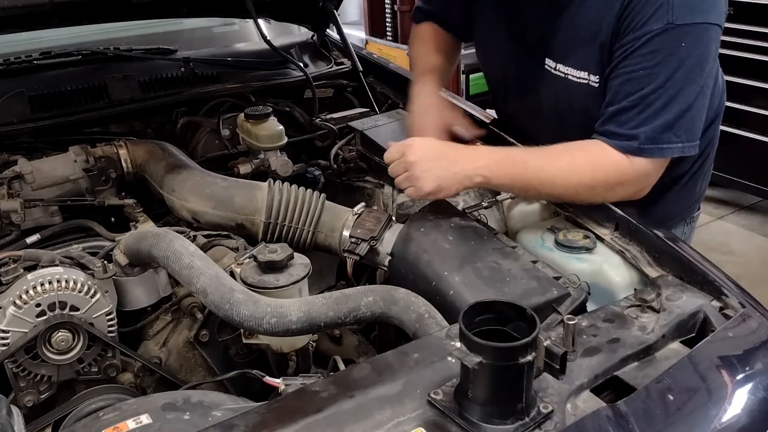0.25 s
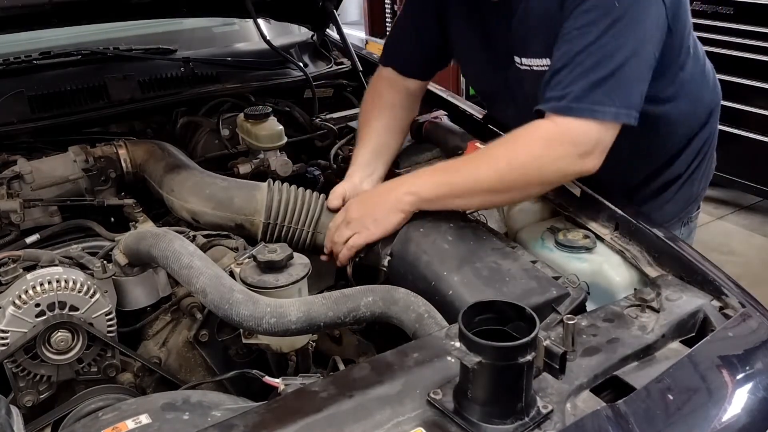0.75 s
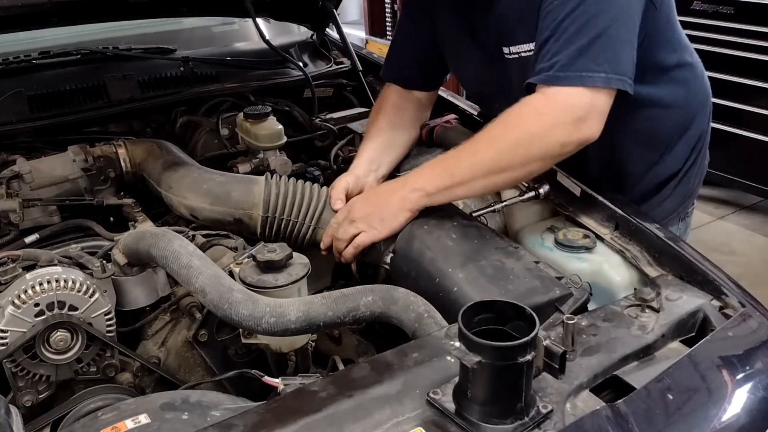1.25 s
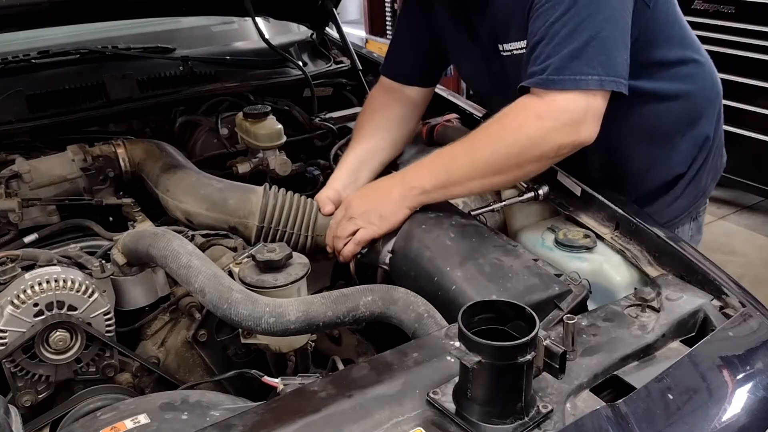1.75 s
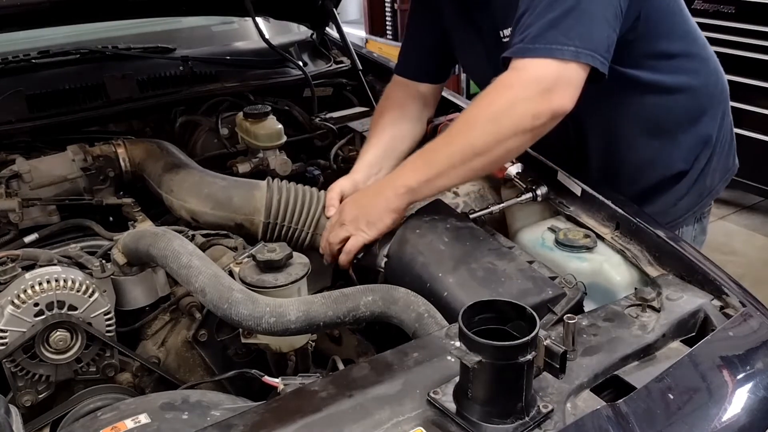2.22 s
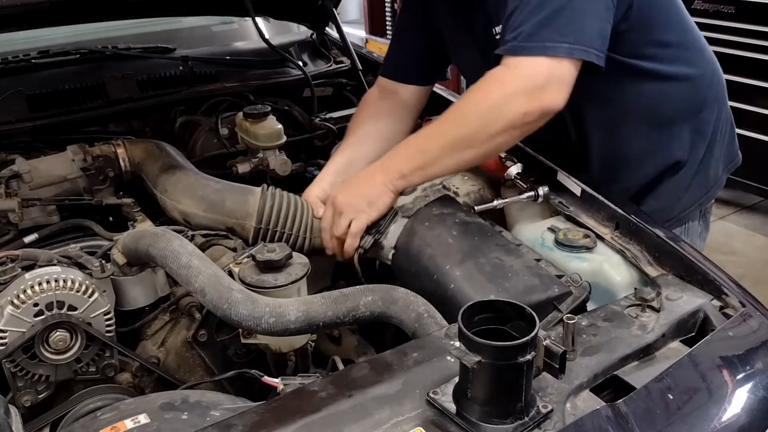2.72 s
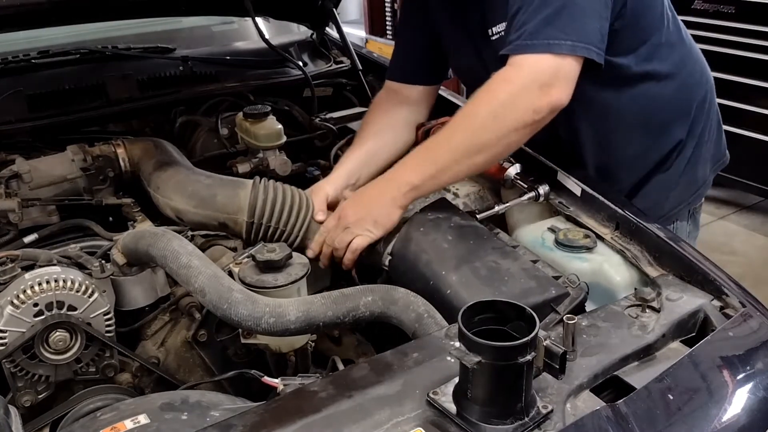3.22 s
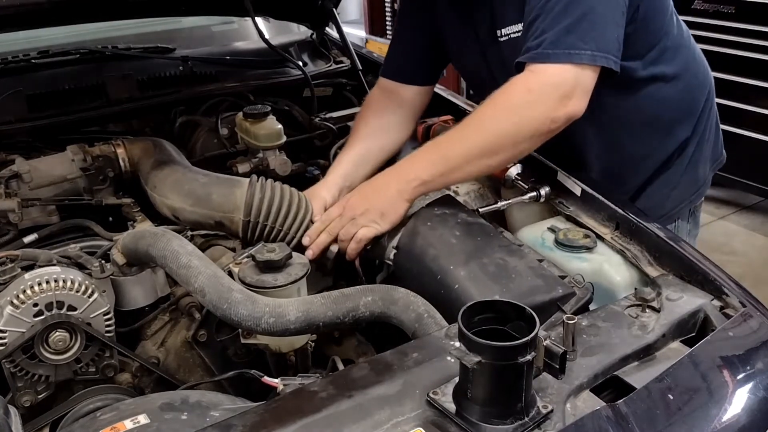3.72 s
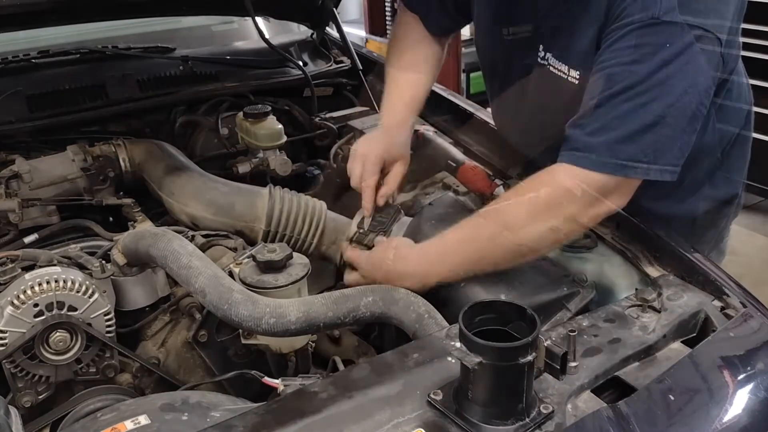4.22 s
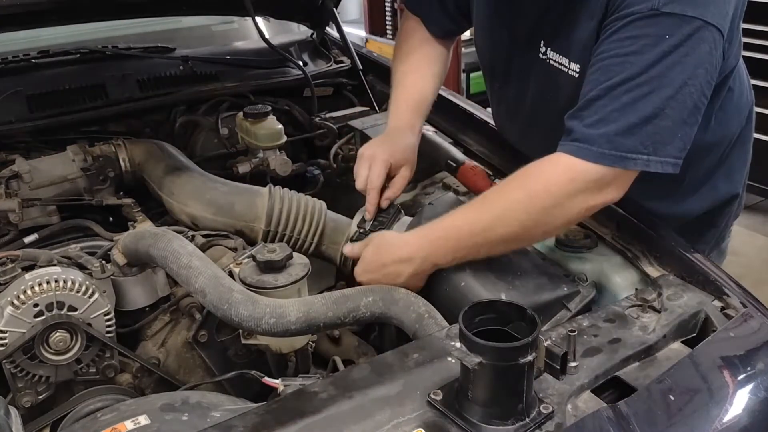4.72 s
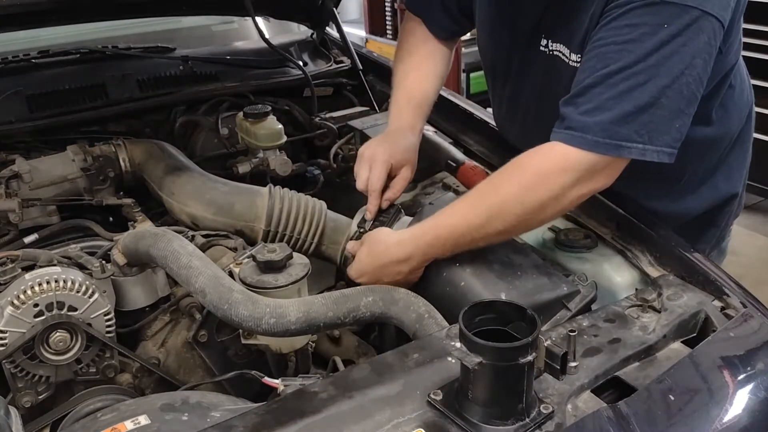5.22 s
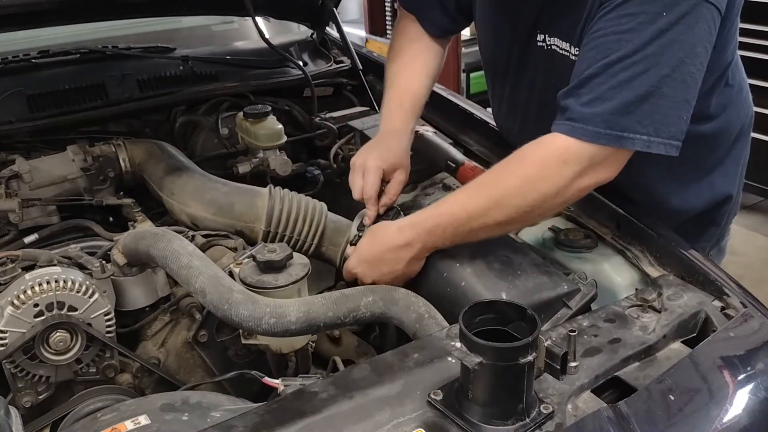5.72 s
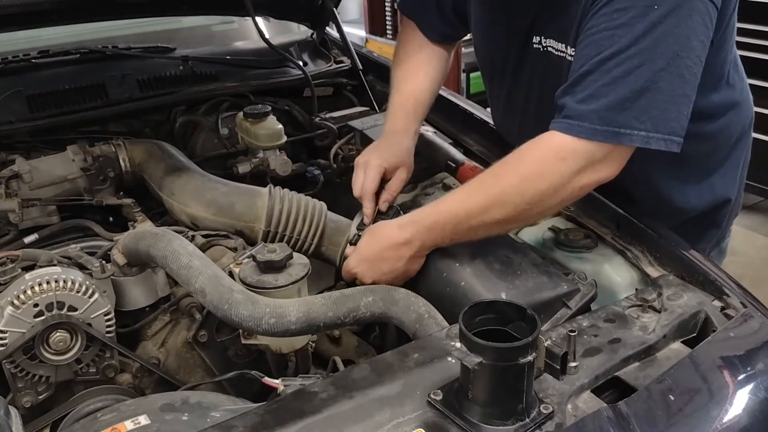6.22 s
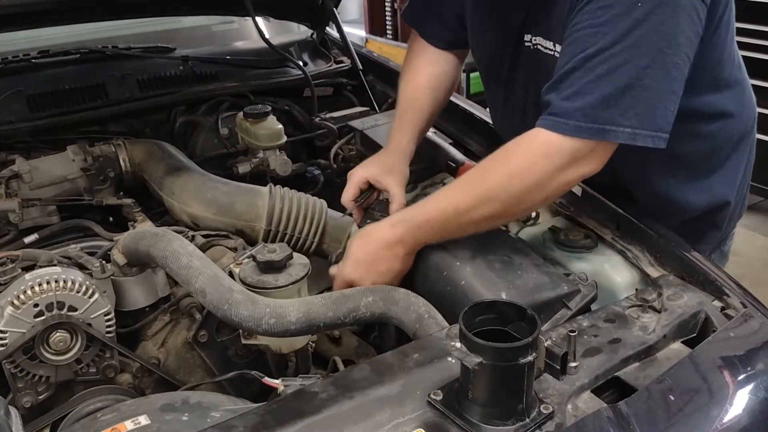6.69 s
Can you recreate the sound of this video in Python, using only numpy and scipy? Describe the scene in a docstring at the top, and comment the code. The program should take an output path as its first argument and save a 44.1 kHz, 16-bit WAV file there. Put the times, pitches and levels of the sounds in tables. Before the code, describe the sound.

Someone works a rubber duct loose from a plastic air box under a car hood. Booming thuds and scrapes come first, then faint rubbing, a second cluster of hard knocks, rubber dragging and small clamp taps. The later part is mostly soft hum and air noise until a final ringing tool knock. Nearby microphone, live hard-walled garage.

```python
"""Hands and a tool work a rubber intake duct loose from a plastic air box under an open car hood. Over hum, air
noise and hiss, hard blows boom and a noisy swell lingers; lighter knocks, rubs and clicks follow. After 2.6 s
come a burst of blows, two more swells, taps on a ringing steel clamp and faint rings of the tool. A last loud
knock, tool ring and swell close it. Blows, clamp and tool are decaying modes, clicks, rubs and swells are
shaped noise, and all the handling echoes from the hard walls of a garage."""
import sys
import numpy as np
from scipy import signal
from scipy.fft import rfft, irfft, next_fast_len
from scipy.io import wavfile
from scipy.ndimage import map_coordinates

SR = 44100
rng = np.random.default_rng(int(sys.argv[2]) if len(sys.argv) > 2 else 0)


def transcribe(signal):
    """Save signal, clipped to [-1, 1], as a 16-bit WAV file at the path in sys.argv[1]."""
    frames = np.atleast_2d(signal).T
    limited = np.clip(frames, -1, 1)
    pcm = np.round(limited * 32767).astype(np.int16)
    wavfile.write(sys.argv[1], SR, pcm)


N = 306495  # samples
LEAD = SR // 4  # samples ahead of time zero, for sounds that begin earlier


def amp(db):
    """Decibel law: level in dB to amplitude ratio."""
    return 10 ** (np.asarray(db) / 20)


def unit(x):
    """Normalisation to rms 1."""
    return x / np.sqrt(np.mean(x ** 2) + 1e-20)


def onset_unit(x):
    """Normalisation to rms 1 over the first fiftieth of a second."""
    return x / np.sqrt(np.mean(x[..., :SR // 50] ** 2) + 1e-20)


def along(points, hz):
    """Interpolation of (Hz, value) points on a logarithmic frequency axis."""
    f, v = np.transpose(points)
    return np.interp(np.log(hz + 1), np.log(f), v)


def band(x, lo_hz, hi_hz, order=3):
    """Causal band-pass filtering."""
    edges = [lo_hz, min(hi_hz, SR / 2 - 1000)]
    return signal.sosfilt(signal.butter(order, edges, "band", fs=SR, output="sos"), x)


def add(track, s, sound):
    """Superposition: lay a sound into the track at time s."""
    start = max(LEAD + round(s * SR), 0)
    part = track[:, start:start + sound.shape[-1]]
    part += sound[..., :part.shape[1]]


def wobble(rate):
    """Random modulation: a smooth curve with rate knots a second."""
    return map_coordinates(rng.standard_normal(200), [np.arange(N) * rate / SR], mode="wrap")


# Stereo width of diffuse sound. Each row: frequency in Hz, side level minus mid level in dB.
SIDE_WIDTH = [(60, -14), (170, -12.5), (350, -11.5), (700, -4), (1500, -0.5), (12000, 1.5)]


def diffuse(n, spectrum=((1000, 0),)):
    """Diffuse field: stereo noise of rms 1, near mono in the bass and wide in the treble."""
    m = next_fast_len(n)
    hz = np.fft.rfftfreq(m, 1 / SR)
    width = amp(along(SIDE_WIDTH, hz))
    gain = amp(along(spectrum, hz)) / np.hypot(1, width)
    noise = rfft(rng.standard_normal((2, m)))
    mid, side = irfft(noise * [gain, gain * width], m)[:, :n]
    return unit(np.array([mid + side, mid - side]))


# Course of the hum. Each row: time in seconds, gain of mains and air in dB, gain of motor in dB.
HUM_GAINS = [(0, 7, -8), (2.5, 4, -12), (4, 6, -15), (4.17, -3, -10.5), (4.45, 3, -1.5), (6.95, 4, -1)]
# Mains tones. Each row: frequency in Hz, level in dB before the gains.
MAINS_TONES = [(59.2, -80.5), (118.4, -71.5)]
# Motor tones. Each row: frequency in Hz, level in dB before the gains.
MOTOR_TONES = [(102.3, -74), (204.6, -77)]
# Shape of the air noise. Each row: frequency in Hz, relative density in dB per Hz.
AIR_SPECTRUM = [(20, -29), (36, -21.5), (54, -8), (80, -7), (115, 3), (160, -5.5), (280, -14), (470, -18.5),
                (800, -23), (2300, -29.5), (15500, -40)]


def background(air_db=-71, hiss_db=-86, waver_db=3.0, waver_rate=6, drift_rad=0.058):
    """Amplitude and phase modulation: mains and distant motor tones waver over air noise and hiss."""
    t = np.arange(N) / SR

    def tones(lines):
        total = 0
        for hz, db in lines:
            level = amp(db + waver_db * wobble(waver_rate)) * np.sqrt(2)  # rms to peak
            phase = 2 * np.pi * (hz * t + rng.random()) + drift_rad * wobble(waver_rate)
            total = total + level * np.sin(phase)
        return total

    s, *columns = np.transpose(HUM_GAINS)
    mains_gain, motor_gain = (amp(np.interp(t, s, db)) for db in columns)
    hiss = amp(hiss_db) * rng.standard_normal((2, N))
    mains_and_air = tones(MAINS_TONES) + amp(air_db) * diffuse(N, AIR_SPECTRUM)
    return mains_gain * mains_and_air + motor_gain * tones(MOTOR_TONES) + hiss


# Decay of the garage. Each row: frequency in Hz, time to fall 60 dB in seconds.
GARAGE_T60 = [(100, 0.53), (300, 0.88), (1000, 0.85), (2700, .95), (5500, 1.1), (8000, 0.57), (14000, 0.64)]
# Strength of the wall echo. Each row: frequency in Hz, relative level in dB.
WALL_ECHO = [(70, 6), (130, -5), (280, 2), (480, 0), (800, 0), (1500, -1.5), (2100, -1), (2900, -1.5),
             (3800, -1.5), (7000, -3.5), (14000, -6)]


def garage(x, build_up_s=0.0053, echo_db=1):
    """Reverberation: convolution with dense noise that builds up fast and decays by frequency."""
    n = 3 * SR // 2
    hz, t, z = signal.stft(diffuse(n), SR, nperseg=512)
    t60 = along(GARAGE_T60, hz)[:, None]
    # the root keeps the tail's energy independent of its decay time
    equal_energy = np.sqrt(np.log(10 ** 6) / (t60 * SR))
    fade = amp(along(WALL_ECHO, hz)[:, None] - 60 * t / t60) * equal_energy
    tail = signal.istft(z * fade, SR, nperseg=512)[1][:, :n]
    tail = tail * (1 - np.exp(-np.arange(n) / SR / build_up_s))
    return amp(echo_db) * signal.fftconvolve(x, tail, axes=1)[:, :LEAD + N]


def grit(spectrum, depth_db, slips_hz=250):
    """Rough noise: one second of noise whose level jumps about unevenly."""
    t = np.arange(SR) / SR
    slips = map_coordinates(rng.standard_normal(1000), [t * slips_hz], order=1, mode="wrap")
    return diffuse(SR, spectrum) * amp(depth_db * slips)


def stroke(half_length, firmness=3.5):
    """Swell and fade about the half second; more firmness starts and stops it more squarely."""
    t = np.arange(SR) / SR
    return np.exp(-.5 * np.abs((t - .5) / half_length) ** firmness)


# Light strokes of the hands. Each row: middle in seconds, half length in seconds, level in dB, centre in Hz.
HAND_STROKES = [(0.709, 0.075, -66, 2560), (1.055, 0.07, -72, 1740), (1.202, 0.042, -66, 4170),
                (1.421, 0.44, -77, 372), (2.071, 0.033, -66, 766), (2.074, 0.043, -75, 3370),
                (2.496, 0.071, -68, 1180), (2.723, 0.015, -52, 4600), (3.614, 0.025, -61.5, 2040),
                (3.693, 0.093, -60.5, 240), (3.782, 0.029, -62, 2600), (4.226, 0.021, -70, 1000),
                (4.868, 0.053, -80, 3500), (5.787, 0.026, -69.5, 7100)]


def hand_rubs(rough_db=4, spread=2.1):
    """Stick-slip friction of the hands over the parts, heard in one band about each centre pitch."""
    track = np.zeros((2, LEAD + N))
    for s, half_length, db, hz in HAND_STROKES:
        friction = band(grit(SCATTER_SPECTRUM, rough_db), hz / spread, hz * spread, order=2)
        add(track, s - .5, amp(db) * unit(friction) * stroke(half_length))
    return track


# Noisy resonant swells that linger after hard blows. Each row: middle in seconds, half length in seconds, level
# in dB.
TAIL_SWELLS = [(0.257, 0.085, -42.5), (2.959, 0.22, -46), (3.299, 0.11, -54.5), (6.788, 0.075, -48.5)]
# Sound of the swells. Each row: frequency in Hz, relative density in dB per Hz.
SWELL_SPECTRUM = [(60, -22.5), (170, 2), (330, -2.5), (520, -4), (830, 1), (1250, -6.5), (1650, -10.5),
                  (2100, -13), (2950, -14.5), (3400, -28), (7000, -37), (15000, -56.5)]


def tail_swells(rough_db=2.5, mode_lift_db=5, mode_width_hz=22):
    """Resonant swell: the noise is lifted at every mode of the plastic."""
    track = np.zeros((2, LEAD + N))
    grid = np.arange(20, SR / 2, 2)
    lift = sum(mode_lift_db / (1 + ((grid - hz) / mode_width_hz) ** 2) for hz, _, _ in PLASTIC_MODES)
    spectrum = np.transpose([grid, along(SWELL_SPECTRUM, grid) + lift])
    for s, half_length, db in TAIL_SWELLS:
        add(track, s - .5, amp(db) * unit(grit(spectrum, rough_db)) * stroke(half_length))
    return track


# Small clicks and snaps, among them the sharp crack of some hard blows. Each row: time in seconds, level in dB,
# centre in Hz.
SMALL_CLICKS = [(0.0516, -49, 6270), (1.244, -89.5, 6260), (1.804, -73, 1890), (2.16, -78.5, 5500),
                (2.447, -79, 2990), (2.551, -73, 2173), (2.669, -68.5, 4000), (2.6849, -52.5, 4980),
                (2.7766, -76, 9000), (3.594, -76, 7000), (3.955, -54, 8970), (4.324, -70, 5000),
                (5.775, -73.5, 8850), (5.99, -79, 4160), (6.677, -48.5, 6100)]


def clicks(scatter_db=-16, scatter_t60=0.17, spread=2.0, click_cycles=89):
    """Impulsive excitation: a snap, shorter the higher it is, then scatter off the nearby metal."""
    track, t = np.zeros((2, LEAD + N)), np.arange(SR // 8) / SR
    for s, db, hz in SMALL_CLICKS:
        # the snap falls 60 dB in click_cycles of its centre pitch
        envelope = amp(-60 * t * hz / click_cycles) + amp(scatter_db - 60 * t / scatter_t60)
        snap = band(diffuse(len(t)) * envelope, hz / spread, hz * spread)
        add(track, s, amp(db) * onset_unit(snap))
    return track * amp([[.9], [-.9]])  # dB, left and right


def ring_modes(track, s, db, modes, attack_cycles=0.5, lag_s=.00005):
    """Modal decay: each mode swells within a cycle or so and dies away, a little earlier at the left."""
    t = np.arange(SR // 2) / SR
    for hz, mode_db, t60 in modes:
        envelope = amp(db + mode_db - 60 * t / t60) * (1 - np.exp(-t * hz / attack_cycles))
        add(track, s, envelope * np.sin(2 * np.pi * hz * (t + [[lag_s], [-lag_s]])))


# Modes of the steel tool. Each row: frequency in Hz, relative level in dB, time to fall 60 dB in seconds.
TOOL_MODES = [(1170, -7, 0.055), (1333, 1.5, .06), (1890, -14, .05), (3900, -33, 0.066), (4320, -19, .04)]
# Taps of the tool. Each row: time in seconds, level in dB.
TOOL_STRIKES = [(4.171, -72), (4.324, -60), (5.406, -65.5), (6.677, -36)]


def tool_rings():
    """Free vibration of the steel tool after each tap."""
    track = np.zeros((2, LEAD + N))
    for s, db in TOOL_STRIKES:
        ring_modes(track, s, db, TOOL_MODES)
    return track


# Modes of the hose clamp. Each row: frequency in Hz, relative level in dB, time to fall 60 dB in seconds.
CLAMP_MODES = [(1900, 1, 0.092), (3416, -3, 0.15), (5050, -6, .09), (9060, -1.5, .12)]
# Taps of the clamp. Each row: time in seconds, level in dB.
CLAMP_STRIKES = [(3.595, -73), (3.751, -62)]


def clamp_rings():
    """Free vibration of the steel clamp after each tap."""
    track = np.zeros((2, LEAD + N))
    for s, db in CLAMP_STRIKES:
        ring_modes(track, s, db, CLAMP_MODES)
    return track


# Blows that catch one hollow squarely. Each row: time in seconds, level in dB, frequency in Hz.
HOLLOW_BOOMS = [(.069, -19.5, 235), (.626, -39.5, 554), (2.235, -43, 307), (2.6, -38.5, 525),
                (2.735, -31, 95), (2.741, -23.5, 191.7), (2.777, -24.5, 841), (3.328, -40.5, 550),
                (3.956, -49, 725), (5.777, -38.5, 152), (6.68, -40, 147)]


def booms(boom_t60=.085):
    """Single-mode resonance: one hollow of the plastic booms under a square blow."""
    track = np.zeros((2, LEAD + N))
    for s, db, hz in HOLLOW_BOOMS:
        ring_modes(track, s, db, [(hz, 0, boom_t60)])
    return track


# Blows on duct and air box. Each row: time in seconds, level in dB before the trims, brightness in dB
# (below 0 a padded thud, above 0 a hard rap).
BLOWS = [(-.1, -25, -0.5), (0.0525, -30.5, 4.5), (0.0601, -30, 0.5), (.072, -35, -7.5), (.599, -53.5, -4),
         (0.6227, -44, -8.5), (.643, -54, -4), (.704, -53, -10.5), (.756, -59.5, -13), (1.167, -61, -9),
         (1.183, -55, -11), (1.2, -57, 1.5), (1.358, -74.5, -6), (1.483, -69, 4.5), (1.542, -67.5, -1),
         (1.601, -65.5, -4.5), (2.159, -67, -3), (2.231, -52, -10), (2.467, -64.5, -8), (2.597, -52.5, -9),
         (2.6853, -42.5, -9), (2.716, -36, -3.5), (2.738, -33, -3.5), (2.775, -34, -1.5),
         (2.791, -36.5, -3), (2.948, -44, -11.5), (3.325, -50.5, -8), (3.424, -57.5, -3.5),
         (3.636, -62.5, -8), (3.752, -54, 2.5), (3.954, -63, 5.5), (4.324, -74, 0), (5.103, -71, -6.5),
         (5.756, -52.5, -3), (5.775, -53, -1.5), (6.274, -72.5, -9), (6.675, -41.5, 2)]
# Four parts of a blow, thud to crack. Each row: scatter's time to fall 60 dB in seconds, contact spike
# in dB before the common gain, trim in dB, dB gained per dB of brightness.
BLOW_PARTS = [(0.2102, 7.5, -3.5, -1), (0.15, 5.5, 1, 0), (0.14, 3.5, -3.5, 1), (0.14, -8, -18.5, 1)]
# Bands of those four parts. Each row: low edge in Hz, high edge in Hz.
PART_BANDS = [(130, 360), (460, 1050), (1100, 3100), (3100, 15700)]
# Modes of duct and air box. Each row: frequency in Hz, relative level in dB, time to fall 60 dB in seconds.
PLASTIC_MODES = [(117.2, 0, 0.26), (170, -9.5, 0.053), (235, -4, 0.059), (323.7, -1.5, 0.17),
                 (365.6, 1, 0.064), (448, -26, 0.062), (517.7, -3.5, 0.065), (688.6, 12, 0.031),
                 (789.5, 2.5, 0.1), (865, -24.5, 0.091), (1077, -19.5, 0.038), (1270, -28, 0.068),
                 (1458, -8, 0.055), (1676, -14, 0.21), (2580, -11.5, 0.074), (3010, -16.5, 0.17)]
# A blow scattered among the engine parts. Each row: frequency in Hz, relative density in dB per Hz.
SCATTER_SPECTRUM = [(50, -5), (110, -5.5), (240, -2), (450, 4), (820, 0.5), (1500, -9.5), (2100, -12),
                    (2900, -16), (3500, -19.5), (7000, -22.5), (10000, -28.5), (15000, -35)]


def knocks(ring_db=-9, mode_spread_db=2, spike_gain_db=7, hard_hz=7000, db_per_octave=6.5, echo_db=-3.5):
    """Impact excitation: contact spike, plastic modes and scatter; near sound and share to the walls."""
    near, t = np.zeros((2, LEAD + N)), np.arange(SR // 4) / SR
    hz, mode_db, t60 = np.transpose(PLASTIC_MODES)[:, :, None]
    for s, db, brightness_db in BLOWS:
        # where the blow lands sets the strength and sign of each mode
        strength = amp(mode_db + mode_spread_db * rng.standard_normal(hz.shape))
        strength = strength * rng.choice([-1, 1], hz.shape)
        modes = strength * amp(-60 * t / t60) * np.sin(2 * np.pi * hz * t)
        ring = amp(ring_db) * np.sum(modes, axis=0)
        scatter = diffuse(len(t), SCATTER_SPECTRUM)
        # a padded blow stays longer in contact, which rounds off the top of every part
        corner_hz = min(hard_hz * 2 ** (brightness_db / db_per_octave), SR / 3)
        contact = signal.butter(1, corner_hz, fs=SR)
        for (scatter_t60, spike_db, trim_db, lean), (lo_hz, hi_hz) in zip(BLOW_PARTS, PART_BANDS):
            spike = amp(spike_db + spike_gain_db) * (t == 0)
            part = ring + scatter * amp(-60 * t / scatter_t60) + spike
            part = band(signal.lfilter(*contact, part), lo_hz, hi_hz)
            add(near, s, amp(db + trim_db + lean * brightness_db) * onset_unit(part))
    return near, amp(echo_db) * near


def scene(small_echo_db=-6, ring_echo_db=-3):
    """Direct plus reverberant field: small sounds deep in the engine bay reach the walls more weakly."""
    near, outward = knocks()
    small = clicks() + hand_rubs() + tail_swells()
    ringing = tool_rings() + clamp_rings() + booms()
    echo = garage(outward + amp(small_echo_db) * small + amp(ring_echo_db) * ringing)
    handling = (near + small + ringing + echo)[:, LEAD:]
    return handling * amp([[.2], [-.2]]) + background()  # dB, left and right


def record(dry, top_hz=15750):
    """Band limitation: nothing is kept at or above top_hz."""
    m = next_fast_len(N + SR // 4)
    keep = np.fft.rfftfreq(m, 1 / SR) < top_hz
    return irfft(rfft(dry, m) * keep, m)[:, :N]


dry = scene()
out = record(dry)
transcribe(out)
```